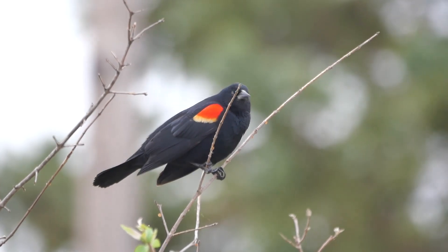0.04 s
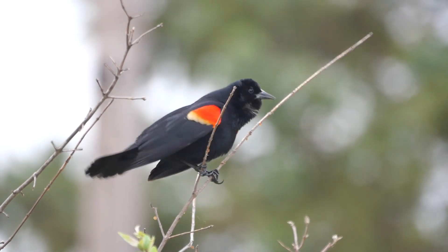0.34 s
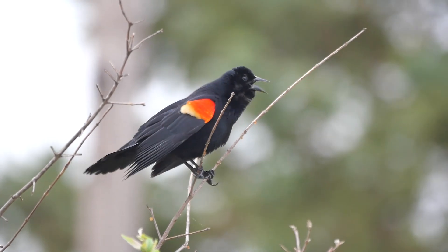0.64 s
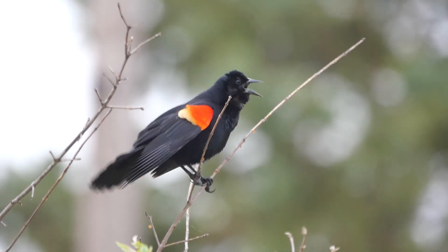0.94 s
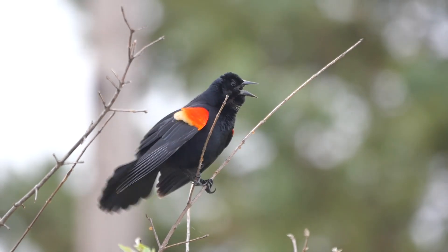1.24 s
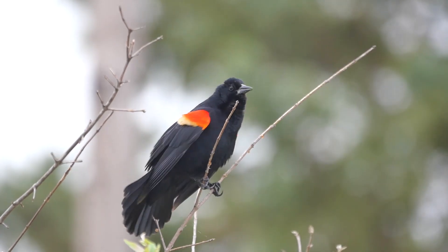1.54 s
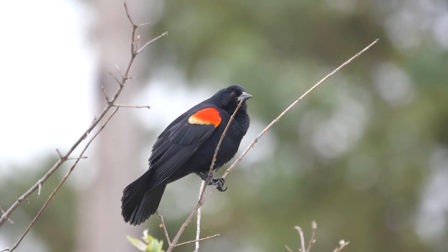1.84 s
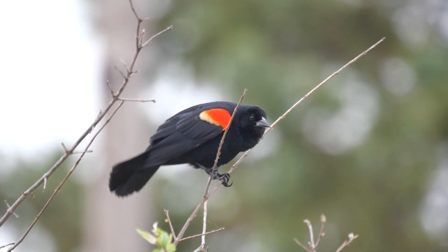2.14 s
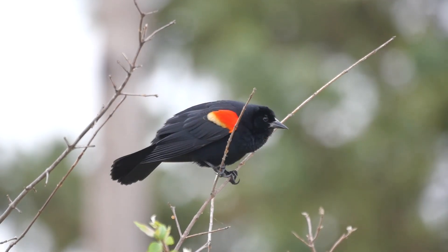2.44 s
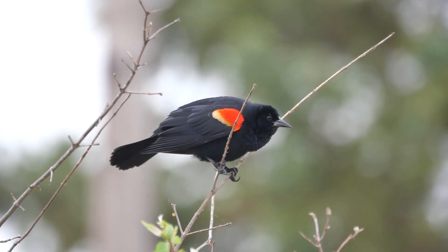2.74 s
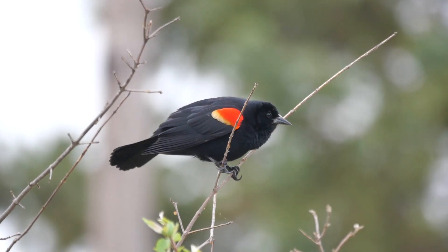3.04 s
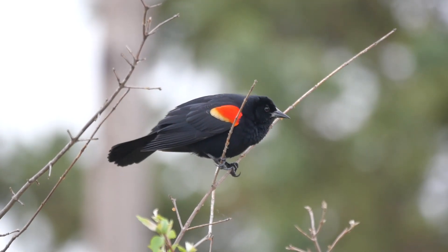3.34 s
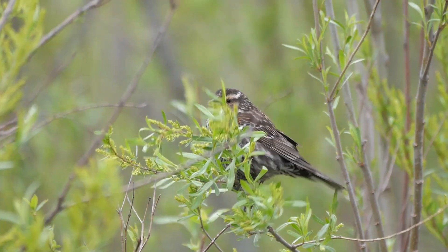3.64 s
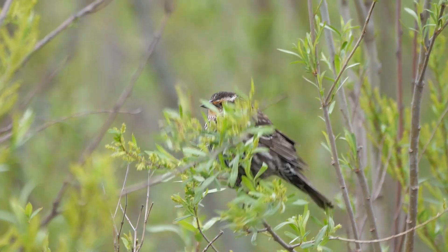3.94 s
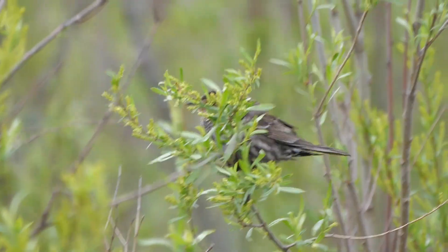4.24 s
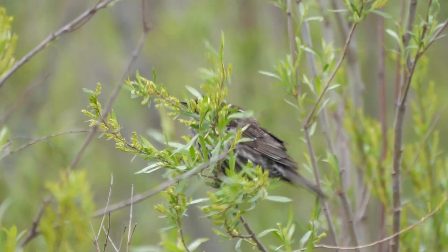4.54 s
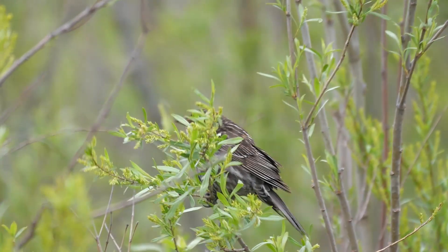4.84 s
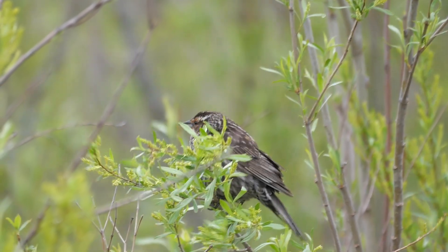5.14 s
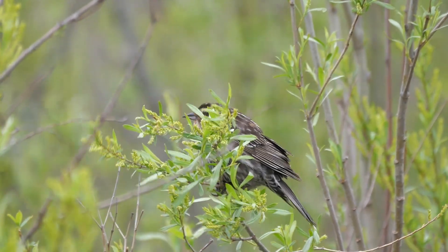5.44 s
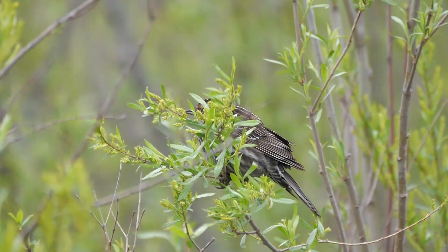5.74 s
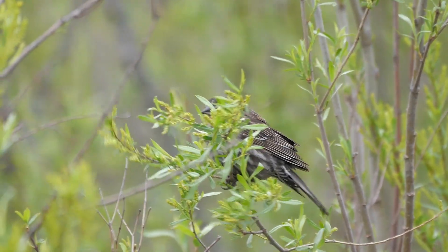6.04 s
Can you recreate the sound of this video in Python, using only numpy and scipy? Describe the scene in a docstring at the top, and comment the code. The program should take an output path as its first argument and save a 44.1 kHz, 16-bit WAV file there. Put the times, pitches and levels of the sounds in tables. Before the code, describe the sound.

A blackbird sings close by among trees. A few liquid notes break into a harsh, throbbing trill, followed by a loud warbled chirp, a falling whistle and a quick run of sharp chips. The background then drops a little, leaving faint whistles, a brief leaf rustle and dry chucks. Another bird repeats high swooping calls at the end. A distant bird chorus continues throughout, with a light outdoor echo.

```python
"""Among trees, a red-winged blackbird sings from a twig: liquid notes, a buzz into a harsh throbbing
trill, a loud warbled chirp, a falling whistle and a run of sharp chips. The two sides of its syrinx
make tones and pulses that the throat colours. Other birds whistle and chuck around it, leaves rustle,
and the trees throw everything back over the wash of a far chorus."""
import sys
import numpy as np
from scipy import signal
from scipy.fft import rfft, irfft, next_fast_len
from scipy.io import wavfile
from scipy.ndimage import uniform_filter1d

SR = 44100
rng = np.random.default_rng(int(sys.argv[2]) if len(sys.argv) > 2 else 0)


def to_wav(s):
    """Save 16-bit WAV."""
    ch = np.atleast_2d(s).T  # columns
    pcm = np.round(np.clip(ch, -1, 1) * 32767)  # PCM
    wavfile.write(sys.argv[1], SR, pcm.astype(np.int16))


N = 277389

# throat response for rasps and chips: freq_hz, gain_db
RASP_COLOUR = [(350, -86), (600, -83), (1390, -18), (1930, -18), (2900, -1), (5430, -2), (6650, -23.5),
               (11100, -25.5), (15400, -46.5)]


def trill(start_s=1.016, length_s=.577, pitch_hz=2938, chop_hz=357, upper_hz=5090):
    """One side of the syrinx holds a tone, the other chops it into pulses; low and high swell by turns."""
    # throb speed: time_s, rate_hz
    throbs = [(1.016, 39.5), (1.14, 39), (1.23, 31.2), (1.33, 37.5), (1.55, 36)]
    # throat response: freq_hz, gain_db
    throat = [(410, -84.5), (700, -63), (1750, -20.5), (2300, -22), (2920, -2), (3830, -6.5), (5220, -14.5),
              (5740, -28), (12000, -53), (15600, -93), (22000, -120)]
    attack_s, release_s, lift_s, sag_db_per_s = .012, .029, .014, -3.5
    t = np.arange(0, length_s, 1 / SR)
    gate = np.minimum(1, np.minimum(t / attack_s, (t[-1] - t) / release_s))
    throb = np.tanh(2 * np.cos(phase(np.interp(start_s + t, *np.transpose(throbs))) - 1.7) - .3)
    swell = 2 ** (throb * (1 + .2 * wander(len(t), 25)))
    end_lift = .2 * np.exp((t - t[-1]) / lift_s)
    carrier = phase(pitch_hz * (1 + end_lift + .007 * wander(len(t), 200)))
    chop = phase(chop_hz * (1 + .022 * wander(len(t), 120)))
    pulses = unit_rms(sum(np.cos(carrier + k * chop + k * k / 2) for k in range(-5, 20)))
    puffs = unit_rms(np.exp(np.cos(chop)) * rng.standard_normal(len(t)))
    rattle = colour(pulses + .75 * puffs, throat)
    low = resonate(rattle, hz=2640, width_hz=620)
    tone = gain_of(-2) * np.cos(carrier) * (1 + .3 * np.cos(chop) + .56 * wander(len(t), 500))
    upper_gain = gain_of(-7 + 2 * wander(len(t), 20))
    upper = upper_gain * np.cos(phase(upper_hz * (1 + .007 * wander(len(t), 200))))
    voice = (low + tone) * swell + gain_of(-2) * (rattle - low) + upper / swell
    return start_s, gain_of(-14.5 + sag_db_per_s * t) * gate * unit_rms(voice)


def buzz(start_s=.947, length_s=.075, pulse_hz=337, closed_hz=3000, open_hz=3750, upper_hz=5030):
    """Pulses ring two resonances; as the beak opens the main one climbs and widens, the upper grows."""
    opening_s, attack_s, fade_db_per_s = .035, .01, -70
    t = np.arange(0, length_s, 1 / SR)
    closed = np.exp(-t / opening_s)
    main_hz = open_hz + (closed_hz - open_hz) * closed
    turn = phase(pulse_hz * (1 - .08 * closed ** 2) * (1 + .008 * wander(len(t), 300)))
    pulses = unit_rms(sum(np.cos(k * turn - k * k / 2) for k in range(8, 16)))
    pulses += (.12 + .5 * closed ** 2) * rng.standard_normal(len(t))
    main = resonate(resonate(pulses, main_hz, 930), main_hz, 930)
    upper = resonate(resonate(pulses, upper_hz, 450), upper_hz, 450)
    ring = (1 - closed) * main + 2 * closed * resonate(main, main_hz, 400)
    ring += gain_of(-2) * (1 - closed) ** 2 * upper
    envelope = np.minimum(t / attack_s, 1) * gain_of(-9.5 + fade_db_per_s * t)
    return start_s, faded(envelope * unit_rms(ring))


def chirp(start_s=1.746, length_s=.18, high_hz=5000, low_hz=2050, lag_s=.0035, detune=.96):
    """Pitch arches, ever quicker and lower; the second side lags and beats; both sides roughen."""
    slide_at_s, slide_s, warble_hz, warble_hz_per_s = .103, .027, 28.5, 590
    attack_s, hold_s, fade_db_per_s = .02, .047, -210
    t = np.arange(0, length_s, 1 / SR)
    top_hz = low_hz + (high_hz - low_hz) / (1 + np.exp((t - slide_at_s) / slide_s))
    dip = np.cos(phase(warble_hz + warble_hz_per_s * t) / 2) ** 6
    hz = top_hz * (1 - .32 * dip)
    db = -8.5 + fade_db_per_s * np.maximum(t - hold_s, 0) - 5 * dip
    jitter = .7 * t
    first = syrinx(hz, db, jitter, overtones_db=[-24], flutter_db=2, slip_rad=.4)
    second = syrinx(detune * np.interp(t - lag_s, t, hz), db - 4, jitter, flutter_db=2.5)
    return start_s, limited((first + second) * np.minimum(t / attack_s, 1), ceiling=.84)


def chips(arch_s=.022, fall_s=.0115, lag_s=.005, end_hz=1450, fade_db_per_s=-1150):
    """Each chip creeps up and plunges; hard ones arch rounder, rasp, and add the lagging second side."""
    # chip run: corner_s, top_hz, arch_db, downstroke_db
    calls = [(2.492, 4850, -25, -30), (2.571, 4600, -30, -27.5), (2.653, 4550, -21, -26),
             (2.738, 4600, -18.5, -22.5), (2.821, 4300, -19, -24), (2.881, 5100, -15.5, -20),
             (2.909, 4050, -22.5, -25), (2.965, 4950, -21, -16.5), (2.989, 4050, -20.5, -26.5),
             (3.06, 4850, -14, -14.5), (3.076, 4150, -18.5, -22), (3.175, 4800, -16.5, -10.5),
             (3.279, 4500, -16.5, -13), (3.399, 4600, -16, -12.5), (3.521, 4400, -13, -11.5)]
    soft_db, hard_db = -26, -12
    out = np.zeros(N)
    t = np.arange(-arch_s, arch_s, 1 / SR)
    early, late_s = np.maximum(-t / arch_s, 0), np.maximum(t, 0)
    envelope_db = 4 - 13 * early ** 6 + fade_db_per_s * np.maximum(t - lag_s, 0)
    for corner_s, top_hz, arch_db, downstroke_db in calls:
        force = np.interp(downstroke_db, [soft_db, hard_db], [0, 1])
        db = envelope_db + np.interp(t, [0, lag_s], [arch_db, downstroke_db])
        arch_hz = top_hz * (1 - .1 * (1 - force) * early - .22 * force * early ** 4)
        hz = end_hz + (arch_hz - end_hz) * np.exp(-(late_s / fall_s) ** 1.6)
        second_hz = np.interp(t - lag_s, t, hz) * rng.uniform(.9, .97)
        second = force * (1 - early ** 2) * chip_side(second_hz, db - 3)
        rasp = force * (1 - early) * gain_of(db - 16) * colour(rng.standard_normal(len(t)), RASP_COLOUR)
        add(out, corner_s - arch_s, chip_side(hz, db) + second + faded(rasp))
    return limited(out, ceiling=.68)


def chip_side(hz, db, partials_db=(0, -4, -8)):
    """One side of the syrinx; its overtones flare as they fall into the throat's range."""
    turn = phase(hz * (1 + .016 * wander(len(hz), 300)))
    slip = wander(len(hz), 300)
    tone = np.zeros(len(hz))
    for k, partial_db in enumerate(partials_db, 1):
        gain = gain_of(db + partial_db + curve_at(RASP_COLOUR, k * hz))
        tone += gain * np.sin(k * turn + (k - 1) * slip)
    return faded(tone)


def liquid_notes(settle_share=.22):
    """Each note slides quickly onto its pitch and rests there."""
    # near bird's notes: start_s, length_s, start_hz, settled_hz, level_db, crest_share, jitter_ratio
    notes = [(0.602, .16, 1308, 1222, -31, 0.64, 0.01), (.752, 0.067, 2620, 2186, -15, 0.59, 0.02),
             (0.754, 0.043, 2728, 2093, -22.5, 0.2, 0.08), (0.807, 0.094, 2170, 2145, -16, 0.28, 0.01),
             (0.828, 0.093, 2730, 2600, -28, 0.47, 0.05), (0.904, .022, 2470, 2670, -20, 0.3, 0.12),
             (0.911, 0.0393, 2020, 1556, -26.5, 0.57, 0.04), (1.54, 0.044, 3410, 3085, -20.5, .5, .03),
             (1.591, 0.067, 1653, 1516, -24.5, 0.38, 0.01)]
    out = np.zeros(N)
    for start_s, length_s, start_hz, settled_hz, level_db, crest_share, jitter in notes:
        t = np.arange(0, length_s, 1 / SR)
        hz = settled_hz + (start_hz - settled_hz) * np.exp(-t / (settle_share * length_s))
        db = level_db + hump_db(t, crest_share, edge_db=-15.5)
        note = syrinx(hz, db, jitter, overtones_db=[-30, -25.5, -54, -36.5, -28], slip_rad=.3)
        add(out, start_s, note)
    return out


def whistle(start_s=2.262, length_s=.36, high_hz=5395, low_hz=3700, settle_s=.053, flutter_hz=106.1):
    """A falling whistle, hoarse with a fast flutter that dies out as the pitch settles."""
    t = np.arange(0, length_s, 1 / SR)
    hz = low_hz + (high_hz - low_hz) * np.exp(-t / settle_s)
    flutter = np.cos(phase(flutter_hz * (1 + .08 * wander(len(t), 40)))) * (1 - (t / t[-1]) ** 2)
    db = -22.5 + hump_db(t, .38, edge_db=-14) + 5 * flutter
    return start_s, syrinx(hz, db, jitter=.014, overtones_db=[-27, -34])


def rasps():
    """Harsh bursts from the throat break into the trill."""
    # rasps: crest_s, level_db, half_length_s
    bursts = [(1.043, -14.5, 0.013), (1.217, -11.5, 0.014), (1.397, -10, 0.013), (1.597, -10.5, 0.011)]
    return harsh_bursts(bursts, RASP_COLOUR, pulse_hz=408, stack_hz=1320, ceiling=1.77)


def breath(start_s=.77, crest_s=.95, swell_s=.017):
    """Air hisses through the open beak, swelling just before the trill."""
    # hiss spectrum: freq_hz, gain_db
    spectrum = [(3500, -21), (6000, 3), (9000, -15), (12000, -10)]
    t = np.arange(start_s, crest_s + 2 * swell_s, 1 / SR)
    envelope = gain_of(-53) + gain_of(-35) * np.exp(-((t - crest_s) / swell_s) ** 2)
    return start_s, faded(envelope * colour(rng.standard_normal(len(t)), spectrum))


def swoops(high_hz=7560, dip_hz=3750, low_hz=6180, last_hz=5920, break_hz=6650, sag_hz_per_s=7000):
    """A neighbour drops, climbs to a lower shelf and adds a last tone; it weakens between registers."""
    # repeated phrase: dip_s, drop_db, last_tone_db
    phrases = [(5.51, -38, -35), (5.708, -23.5, -18), (5.909, -18.5, -16.5), (6.111, -16.5, -22)]
    lead_s, turn_s, tail_s = .052, .016, .074
    out = np.zeros(N)
    drop, tail = np.arange(0, lead_s, 1 / SR), np.arange(0, tail_s, 1 / SR)
    t, last = np.r_[drop - lead_s, tail], tail[len(tail) // 2:]
    shelf_hz = np.where(t < 0, high_hz, low_hz) - sag_hz_per_s * t
    hz = shelf_hz + (dip_hz - shelf_hz) * np.exp(-(t / turn_s) ** 2)
    break_db = -8 * np.exp(-((hz - break_hz) / 600) ** 2)
    envelope_db = np.r_[hump_db(drop, .7, edge_db=-18), hump_db(tail, .55, edge_db=-7) - 5]
    for dip_s, drop_db, last_tone_db in phrases:
        add(out, dip_s - lead_s, syrinx(hz, drop_db + break_db + envelope_db, jitter=.01))
        db = last_tone_db + hump_db(last - last[0], .49, edge_db=-18)
        add(out, dip_s + last[0], syrinx(last_hz - sag_hz_per_s * last, db, jitter=.01))
    return out


def neighbours():
    """Single bowed glides whistled by birds in the trees around."""
    # whistles: start_s, length_s, first_hz, last_hz, bow_octaves, level_db
    glides = [(1.983, 0.05, 1965, 1840, 0.17, -38), (3.567, 0.11, 2200, 2466, 0.21, -30.5),
              (3.83, 0.09, 3125, 1995, -0.03, -34.5), (3.896, 0.013, 4050, 2470, 0.038, -32.5),
              (3.98, 0.056, 4330, 6000, 0.21, -43), (4.053, 0.051, 2264, 2267, 0, -36),
              (4.119, 0.054, 4140, 6250, 0.26, -43), (4.262, 0.175, 3134, 3090, -0.0051, -40),
              (5.099, 0.32, 7110, 7320, 0, -49.5), (5.108, 0.23, 3410, 3430, 0, -43.5),
              (5.958, 0.12, 1229, 1195, 0, -47), (5.95, 0.21, 4030, 3850, -0.035, -36.5),
              (6.106, 0.12, 2193, 2177, 0.008, -24.5), (6.24, 0.053, 6570, 6160, 0.041, -29),
              (6.272, 0.035, 5940, 4490, -0.019, -16)]
    out = np.zeros(N)
    for start_s, length_s, first_hz, last_hz, bow_octaves, level_db in glides:
        t = np.arange(0, length_s, 1 / SR)
        u = t / length_s
        hz = first_hz * (last_hz / first_hz) ** u * 2 ** (bow_octaves * (1 - (2 * u - 1) ** 2))
        db = level_db + hump_db(t, .36, edge_db=-6.5)
        add(out, start_s, syrinx(hz, db, jitter=.009, overtones_db=[-32]))
    return out


def chucks():
    """Dry, very short calls from other birds."""
    # chucks: crest_s, level_db, half_length_s
    bursts = [(4.769, -24, 0.007), (5.936, -19, 0.0045), (6.03, -22, .005), (6.286, -19.5, 0.0084)]
    # chuck spectrum: freq_hz, gain_db
    spectrum = [(900, -50), (2000, -13), (2850, 4), (3900, -17), (9000, -42)]
    return harsh_bursts(bursts, spectrum, pulse_hz=507, stack_hz=1382, ceiling=6.4)


def far_trills(throb_hz=33, throb_db=4):
    """The throbbing main tone of far blackbirds."""
    # far tones: start_s, end_s, pitch_hz, level_db
    tones = [(1.949, 2.4, 3450, -42), (2.753, 3.423, 2885, -29.5), (3.45, 3.853, 3420, -42),
             (4.46, 4.806, 2900, -40)]
    out = np.zeros(N)
    for start_s, end_s, pitch_hz, level_db in tones:
        t = np.arange(0, end_s - start_s, 1 / SR)
        db = level_db + throb_db * np.sin(2 * np.pi * throb_hz * t)
        tone = syrinx(np.full(len(t), pitch_hz), db, jitter=.0205)
        add(out, start_s, tone * signal.windows.tukey(len(t), .4))
    return out


def rustle(crest_s=4.7, half_s=.077):
    """Leaves brush as a bird shifts in the bush."""
    spectrum = [(700, -35), (2000, 0), (8500, -2), (12000, -25)]  # freq_hz, gain_db
    swell = np.exp(-((np.arange(N) / SR - crest_s) / half_s) ** 2)
    return gain_of(-45) * swell * colour(rng.standard_normal(N), spectrum)


def tree_echoes(x, density=.06, predelay_s=.008):
    """Scattered returns from trunks and leaves, each band dying at its own speed."""
    # ring time of the trees: freq_hz, t60_s
    decay = [(500, 0.64), (3000, 0.4), (14000, 0.47)]
    taps = rng.standard_normal(SR) * (rng.random(SR) < density) * (np.arange(SR) > predelay_s * SR)
    hz, t, bins = signal.stft(taps, SR, nperseg=256)
    tail = signal.istft(bins * gain_of(-60 * t / curve_at(decay, hz)[:, None]), SR, nperseg=256)[1]
    return signal.fftconvolve(x, tail / np.linalg.norm(tail))[:N]


def chorus(count=900, patchy_db=2):
    """Many far glides, blurred by the trees, melt with noise into a patchy wash."""
    # chorus spectrum: freq_hz, gain_db
    spectrum = [(150, -78), (826, -18), (1260, -11.5), (1650, -7.5), (2290, -5.5), (3410, -3), (6000, -22),
                (7200, -24), (8950, -27), (15400, -33.5)]
    calls = np.zeros(N)
    for when, pitch, length, glide, size in rng.random((count, 5)):
        u = np.linspace(-1, 1, int(SR * (.0245 + .087 * length)))
        hz = 1600 * 4.5 ** pitch * np.exp(.36 * (glide - .5) * u - .0843 * u ** 2)
        add(calls, when * N / SR, gain_of(30.3 * size) * np.sin(phase(hz)) * (1 - u ** 2))
    wash = colour(rng.standard_normal(N) + .42 * unit_rms(calls + tree_echoes(calls)), spectrum)
    hz, _, bins = signal.stft(wash, SR, nperseg=1024)
    patches = uniform_filter1d(rng.standard_normal(bins.shape), size=3, axis=0)
    patches = unit_rms(uniform_filter1d(patches, size=10, axis=1)) * (hz[:, None] > 1000)
    return signal.istft(bins * gain_of(patchy_db * patches), SR, nperseg=1024)[1][:N]


def level_drop(wash, drop_at_s=3.843, crossfade_s=.023):
    """The background wash drops abruptly, mostly in its middle and high bands."""
    middle, high = (signal.sosfiltfilt(signal.butter(3, band_hz, "band", fs=SR, output="sos"), wash)
                    for band_hz in ([2100, 3800], [3800, 7500]))
    after_drop = np.tanh((np.arange(N) / SR - drop_at_s) / crossfade_s)
    middle_db = np.interp(after_drop, [-1, 1], [-42, -46.5])
    high_db = np.interp(after_drop, [-1, 1], [-43.5, -49.5])
    rest = gain_of(-42 + .41 * (high_db - high_db.mean())) * (wash - middle - high)
    return rest + unit_rms(middle) * gain_of(middle_db) + unit_rms(high) * gain_of(high_db)


def far_buzzes(width_octaves=.41):
    """Far buzzy songs, blurred into swells of noise."""
    # songs: crest_s, half_length_s, pitch_hz, level_db
    songs = [(0.018, 0.053, 4620, -36.5), (2.553, 0.22, 4540, -33.5), (3.16, 0.38, 3400, -38)]
    out, t = np.zeros(N), np.arange(N) / SR
    octaves = np.log2(np.fft.rfftfreq(N, 1 / SR) + 1)
    for crest_s, half_s, pitch_hz, level_db in songs:
        response = np.exp(-((octaves - np.log2(pitch_hz)) / width_octaves) ** 2)
        band = unit_rms(irfft(rfft(rng.standard_normal(N)) * response, N))
        swell = np.exp(-((t - crest_s) / half_s) ** 2 / 2)
        out += gain_of(level_db + 2 * wander(N, 60)) * swell * band
    return out


def syrinx(hz, db, jitter, overtones_db=(), flutter_db=1, slip_rad=1):
    """A nearly pure, unsteady tone; any overtones are ragged in phase."""
    hz = uniform_filter1d(hz, size=130) * (1 + jitter * wander(len(hz), 460))
    turn, slip = phase(hz), slip_rad * wander(len(hz), 700)
    tone = sum(gain_of(partial_db) * np.sin(k * turn + (k > 1) * slip) * (k * hz < SR / 2)
               for k, partial_db in enumerate([0, *overtones_db], 1))
    return faded(np.sqrt(2) * tone * gain_of(db + flutter_db * wander(len(hz), 170)))


def harsh_bursts(bursts, spectrum, pulse_hz, stack_hz, ceiling):
    """Uneven puffs mixed with a ragged falling harmonic stack, softly limited."""
    out = np.zeros(N)
    for crest_s, level_db, half_s in bursts:
        u = np.arange(-4 * half_s, 4 * half_s, 1 / SR) / half_s
        pulse = np.cos(phase(pulse_hz * (1 + .282 * wander(len(u), 290))))
        puffs = np.exp(.11 * pulse) * rng.standard_normal(len(u))
        turn = phase(stack_hz * np.exp(-.17 * u + .0417 * wander(len(u), 634)))
        stack = sum(np.cos(k * turn + k * k) for k in range(1, 9))
        analytic = signal.hilbert(colour(unit_rms(puffs) + .48 * unit_rms(stack), spectrum))
        rasp = unit_rms(analytic.real / np.hypot(1, abs(analytic) / ceiling))
        envelope = gain_of(level_db) * np.exp(1 - np.hypot(1, 1.2 * u))
        add(out, crest_s - 4 * half_s, faded(envelope * highpass(rasp, 1000)))
    return out


def limited(x, ceiling):
    """Limits the peak level, so the loudest calls stay loud without clipping."""
    return x / np.maximum(1, abs(signal.hilbert(x)) / ceiling)


def resonate(x, hz, width_hz):
    """A resonance of gain 1 that follows the curve hz."""
    rotor, pole = np.exp(1j * phase(hz * np.ones(len(x)))), np.exp(-np.pi * width_hz / SR)
    return 2 * (rotor * signal.lfilter([1 - pole], [1, -pole], x / rotor)).real


def hump_db(t, crest_share, edge_db):
    """Level of a note that swells to a crest and dies away."""
    u = t / t[-1]
    return edge_db * np.maximum(1 - u / crest_share, (u - crest_share) / (1 - crest_share)).clip(0) ** 2.1


def wander(size, rate_hz):
    """Smooth random drift, rms about 1."""
    padded = size + SR // 4
    response = np.exp(-(np.fft.rfftfreq(padded, 1 / SR) / rate_hz) ** 2)
    return unit_rms(irfft(rfft(rng.standard_normal(padded)) * response))[:size]


def colour(x, spectrum):
    """Filters x by a spectrum, to rms 1."""
    size = next_fast_len(len(x) + 512)
    response = gain_of(curve_at(spectrum, np.fft.rfftfreq(size, 1 / SR)))
    return unit_rms(irfft(rfft(x, size) * response, size)[:len(x)])


def curve_at(points, hz):
    freq_hz, value = np.transpose(points)
    return np.interp(np.log(hz + 1), np.log(freq_hz + 1), value)


def highpass(x, hz):
    return signal.sosfilt(signal.butter(4, hz, "high", fs=SR, output="sos"), x)


def faded(x):
    """Softens both ends over 2 ms."""
    return x * signal.windows.tukey(len(x), min(1, 176 / len(x)))


def phase(hz):
    return 2 * np.pi * np.cumsum(hz) / SR


def gain_of(db):
    return 10 ** (np.asarray(db) / 20)


def unit_rms(x):
    return x / np.sqrt(np.mean(x ** 2) + 1e-20)


def add(mix, start_s, sound):
    part = mix[max(round(start_s * SR), 0):][:len(sound)]
    part += sound[:len(part)]


def scene():
    """The near bird, its neighbours and their echoes over the chorus, in narrow stereo."""
    near = liquid_notes() + chips() + rasps()
    for source in (breath, buzz, trill, chirp, whistle):
        add(near, *source())
    far = neighbours() + swoops() + far_trills() + rustle() + chucks()
    birds = near + gain_of(-1.5) * far
    add(birds, .0042, gain_of(-14) * near)  # return from the ground below
    birds += tree_echoes(gain_of(-13.5) * near + gain_of(-6.5) * far)
    middle = highpass(birds, 700) + level_drop(chorus()) + far_buzzes()
    # left and right differ only by a trace of echo and hiss
    side = gain_of(-32) * tree_echoes(birds)
    side += gain_of(-59) * colour(rng.standard_normal(N), [(300, -55.5), (1500, -2)])
    return np.array([faded(middle + side), faded(middle - side)])


def record(dry, edge_hz=15750):
    """Clips peaks at full scale, then limits the band."""
    lowpass = signal.firwin(511, edge_hz, window=("kaiser", 9), fs=SR)
    return signal.oaconvolve(np.clip(dry, -1, 1), lowpass[None], "same")


dry = scene()
out = record(dry)
to_wav(out)
```